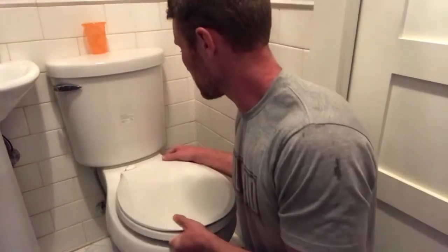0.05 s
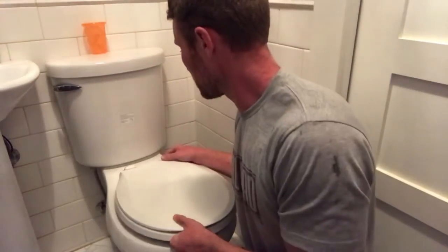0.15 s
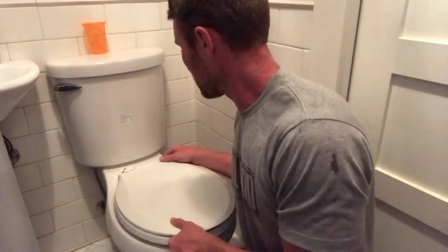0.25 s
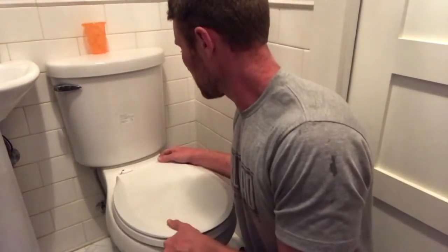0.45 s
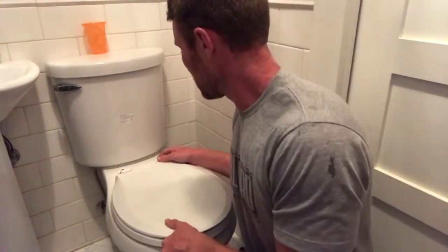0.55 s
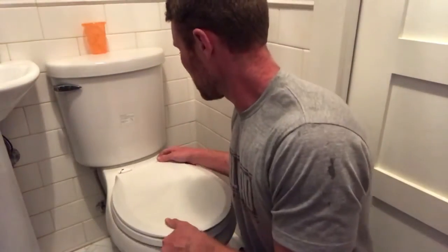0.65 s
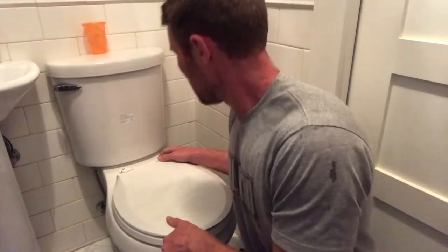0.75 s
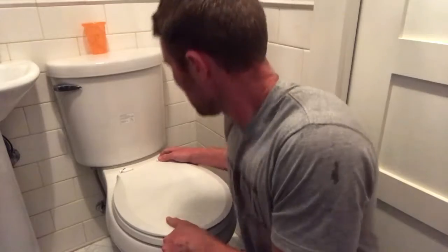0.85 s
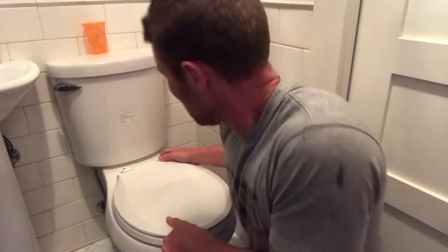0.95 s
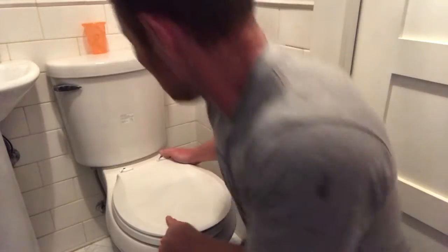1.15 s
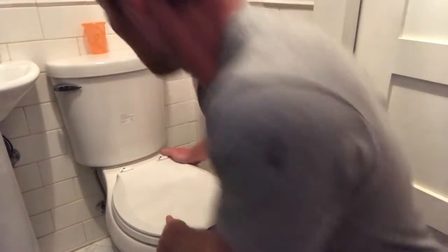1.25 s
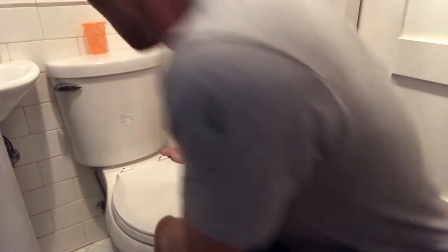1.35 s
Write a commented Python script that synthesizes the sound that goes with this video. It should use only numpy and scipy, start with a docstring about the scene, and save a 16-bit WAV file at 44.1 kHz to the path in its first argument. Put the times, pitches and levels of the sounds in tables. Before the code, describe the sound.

A toilet seat lands close by with a quick double knock, the second louder, leaving a short ring and deep boom in a small tiled bathroom. It settles with a soft bump, and a hand rubs faintly over low ventilation.

```python
"""A soft knock, then a sharper clack: a toilet seat is set down on its bowl in a small tiled bathroom.
The blows set seat and porcelain ringing, the tiles throw the clack back and a deep room boom hangs on.
The seat settles on its bumpers; light bumps and the rub of a hand come before and after.
Underneath are quiet ventilation, a low rumble and a faint regular tick."""
import sys
import numpy as np
from scipy import signal
from scipy.fft import irfft
from scipy.io import wavfile
from scipy.ndimage import uniform_filter1d

SR = 44100
rng = np.random.default_rng(int(sys.argv[2]) if len(sys.argv) > 2 else 0)


def int16_out(signal):
    """Quantize to a 16-bit WAV file."""
    q = np.round(np.clip(np.atleast_2d(signal).T, -1, 1) * 32767)
    wavfile.write(sys.argv[1], SR, q.astype(np.int16))


N = 61739

# tone colour of the seat's clack and of the hand's hiss on it (frequency [Hz], level [dB])
CLACK_SPECTRUM = [(20, -35.5), (200, 3), (1000, -0.5), (1300, -7.5), (1550, -4.5), (1900, 3), (2450, 1),
                  (3100, 0), (3700, -15), (4400, -21.5), (5000, -52), (5800, -32), (7500, -80.5),
                  (15000, -83.5)]


def amp(db):
    """Decibels to gain."""
    return 10 ** (np.asarray(db) / 20)


def unit(x):
    """Scales to rms 1."""
    return x / np.sqrt(np.mean(x ** 2) + 1e-20)


def read(points, hz):
    """Reads a table on a log-frequency axis."""
    f, value = np.transpose(points)
    return np.interp(np.log(hz + 1), np.log(f + 1), value)


def add(mix, start_s, sound):
    """Lays a sound into the mix."""
    part = mix[round(start_s * SR):][:len(sound)]
    part += sound[:len(part)]


def noise(gain):
    """Noise of rms 1 shaped by the function gain(Hz)."""
    hz = np.fft.rfftfreq(N, 1 / SR)
    return unit(irfft(gain(hz) * np.exp(2j * np.pi * rng.random(len(hz))), N))


def coloured(spectrum):
    """Noise with the tone colour of a table."""
    return noise(lambda f: amp(read(spectrum, f)))


def narrow(hz, width_hz):
    """Noise in one resonance."""
    return noise(lambda f: 1 / (1 + ((f - hz) / width_hz * 1.14) ** 2))


def steady(x, size=900):
    """Evens out a noise's chance swells over about size samples."""
    power = uniform_filter1d(uniform_filter1d(x ** 2, size), size // 2)
    return x / np.sqrt(abs(power) + 1e-9)


def ventilation():
    """Soft moving air with a faint flicker, and two steady hums."""
    # colour of the air (frequency [Hz], level [dB])
    air_spectrum = [(15, -28.5), (45, -1), (80, -6.5), (120, -3.5), (160, -7.5), (280, -9.5), (450, -15),
                    (650, -12), (1000, -17.5), (1600, -21), (3200, -25.5), (4200, -28.5), (4900, -33),
                    (5500, -31), (6800, -31.5), (8000, -35.5), (10500, -39.5), (15000, -38)]
    # hums of the ventilation (frequency [Hz], width [Hz], level [dB])
    hums = [(118.3, 5, -68.5), (663, 58, -73)]
    bands = signal.stft(coloured(air_spectrum), nperseg=512)[2]
    patches = uniform_filter1d(rng.standard_normal(bands.shape), size=8, axis=0)
    flicker_db = unit(uniform_filter1d(patches, size=8, axis=1))
    air = amp(-64) * signal.istft(bands * amp(flicker_db), nperseg=512)[1][:N]
    return air + sum(amp(db) * steady(narrow(hz, width), size=6000) for hz, width, db in hums)


def ticks(first_s=0.051, period_s=0.1023, length_s=0.007):
    """Tiny bright blips of noise, about ten a second."""
    out = np.zeros(N)
    window = np.hanning(round(length_s * SR))
    for k in range(14):
        blip = window * narrow(hz=3070, width_hz=500)[:len(window)]
        add(out, first_s + k * period_s, amp(-67.5) * blip)
    return out


def rumble():
    """Faint noise around the room's lowest mode while the seat is handled."""
    # fader curve of the rumble (time [s], level [dB])
    fader = [(0, -55.5), (0.12, -64), (0.2, -60.5), (0.5, -91), (0.64, -61.5), (0.9, -65), (1.0, -79),
             (1.25, -84), (1.4, -65)]
    level_db = np.interp(np.arange(N) / SR, *np.transpose(fader))
    return amp(level_db) * steady(narrow(hz=49.6, width_hz=36), size=4000)


def room_boom(hz=50.7, swell_s=0.083, t60=0.46):
    """The lowest mode of the room swells and dies."""
    t = np.arange(N) / SR
    swell = np.sin(np.pi / 2 * np.minimum(t / swell_s, 1))
    return swell * amp(-26 - 60 * t / t60) * np.sin(2 * np.pi * hz * t)


def tile_tail(spectrum):
    """Dense reflections off the tiles, each band dying at the room's rate."""
    # reverb time of the bathroom (frequency [Hz], t60 [s])
    room_t60 = [(80, 0.38), (260, 0.4), (700, 0.34), (1200, 0.31), (2000, 0.2), (3200, 0.21), (6000, 0.13)]
    hz, t, bands = signal.stft(steady(coloured(spectrum)), SR, nperseg=512, noverlap=384)
    decay = amp(-60 * t / read(room_t60, hz)[:, None])
    return signal.istft(bands * decay, SR, nperseg=512, noverlap=384)[1][:N]


def hand_rub(length_s, hiss_db, ring_db):
    """A sliding hand: soft friction that makes the porcelain bowl sing faintly."""
    sound = amp(hiss_db) * coloured(CLACK_SPECTRUM) + amp(ring_db) * narrow(hz=656.5, width_hz=55)
    window = signal.windows.tukey(round(length_s * SR), 0.5)
    return window * sound[:len(window)]


def settle(db, tilt_db, rise_s=0.0013, t60=0.12):
    """The seat sinks onto its bumpers: a short dull push without any clack."""
    # colour of the push before its tilt (frequency [Hz], level [dB])
    push_spectrum = [(20, -53), (50, -17), (80, -8), (160, 3), (200, -7), (285, 5.5), (410, -15.5),
                     (750, -6), (1050, -12), (1400, -34.5), (4000, -61.5), (15000, -88)]
    t = np.arange(N) / SR
    push = noise(lambda f: amp(read(push_spectrum, f) + tilt_db * np.log2(f + 20)))
    return steady(push, size=600) * (1 - np.exp(-t / rise_s)) * amp(db - 60 * t / t60)


def ring(modes, free_s, mute_s=0.014):
    """Modes build up and decay; after free_s a new blow or the hand chokes them."""
    t = np.arange(N) / SR
    sound = np.zeros(N)
    for hz, db, t60, rise_s in modes:
        envelope = amp(db - 60 * t / t60) * (1 - np.exp(-t / rise_s))
        sound += envelope * np.sin(2 * np.pi * (hz * t + rng.random()))
    return sound * np.exp(-np.maximum(t - free_s, 0) / mute_s)


def clack(contact_s, crack_t60=0.0073, clatter_t60=0.092):
    """Crack of contact, the seat's clatter and the tiles' answer; a briefer contact is crisper."""
    t = np.arange(N) / SR
    envelope = amp(5.5 - 60 * t / crack_t60) + amp(-4 - 60 * t / clatter_t60)
    direct = steady(coloured(CLACK_SPECTRUM), size=120) * envelope
    reflected = amp(-7.5) * tile_tail(CLACK_SPECTRUM)
    return (direct + reflected) * (1 - np.exp(-t / contact_s))


def knock(free_s, contact_s, thud_db, clack_db, seat_db, bowl_db):
    """One blow of seat on bowl: a thud for weight, a clack for edge, and the ring of both bodies."""
    # colour of the thud (frequency [Hz], level [dB])
    thud_spectrum = [(20, -45.5), (50, -16.5), (75, -1.5), (160, -1.5), (300, -0.5), (420, -13), (620, 1),
                     (820, -5.5), (1080, -1), (1300, -18.5), (2000, -12.5), (5000, -68.5), (15000, -100)]
    # resonances of the seat (frequency [Hz], level [dB], t60 [s], build-up [s])
    seat_modes = [(718.5, -8.5, .19, 0.0045), (749, -9.5, .13, 0.0017), (968.7, 9.5, .31, 0.047),
                  (987, 0.5, 0.37, 0.015), (1100, -4.5, 0.22, 0.026), (1120, -19.5, 0.06, 0.022),
                  (1355, -11.5, 0.28, 0.015)]
    # resonances of the porcelain bowl (frequency [Hz], level [dB], t60 [s], build-up [s])
    bowl_modes = [(74.6, -12.5, 0.28, 0.0064), (125, -11.5, 0.23, 0.009), (159.6, -8.5, 0.28, 0.0071),
                  (236, 0.5, 0.15, 0.0034), (291, -6, 0.47, 0.0068), (313, -7, 0.32, 0.002),
                  (621, 4.5, 0.41, 0.027), (658.3, 2, 0.26, 0.004)]
    thud_rise_s, throb_hz = 0.0046, 7.07
    grip_s = 0.165  # from here on the hand damps the seat
    t = np.arange(N) / SR
    thud = tile_tail(thud_spectrum) * (1 - np.exp(-t / thud_rise_s))
    impact = amp(thud_db) * thud + amp(clack_db) * clack(contact_s)
    throb = 1 + 0.68 * np.sin(2 * np.pi * throb_hz * t)
    seat = amp(seat_db) * ring(seat_modes, min(free_s, grip_s)) * throb
    bowl = amp(bowl_db) * ring(bowl_modes, free_s)
    bumper_lowpass = signal.butter(4, 5700, fs=SR, output="sos")  # the bumpers pass little treble
    return signal.sosfilt(bumper_lowpass, impact + seat + bowl)


def scene():
    """The room tone with the seat's knocks, pushes and rubs on top, in mono."""
    # blows on the seat (time [s], contact [s], thud [dB], clack [dB], seat ring [dB], bowl ring [dB])
    blows = [(0.002, 0.00033, -58.5, -53, -65.5, -57), (0.2281, 0.0033, -36, -42, -40, -52.5),
             (0.2768, 0.0019, -45, -31.5, -50.5, -40.5), (0.2802, 0.00054, -33, -28.5, -33.5, -32),
             (0.775, .001, -62, -55.5, -88, -69)]
    # pushes on the bumpers (time [s], level [dB], tilt [dB/octave])
    pushes = [(0.234, -40, -1.5), (0.286, -31, -2.5), (0.308, -33, 1), (0.779, -50.5, -0.5),
              (0.795, -47, -1.5), (0.836, -59, -6)]
    # slides of the hand on the seat (time [s], length [s], hiss [dB], ring [dB])
    slides = [(0.005, 0.058, -94, -53), (0.949, 0.095, -71.5, -69), (0.998, 0.21, -78, -69.5)]
    out = ventilation() + ticks() + rumble()
    gaps_s = np.diff([blow[0] for blow in blows] + [N / SR])
    for (start_s, *blow), gap_s in zip(blows, gaps_s):
        add(out, start_s, knock(gap_s, *blow))
    for start_s, *push in pushes:
        add(out, start_s, settle(*push))
    for start_s, *slide in slides:
        add(out, start_s, hand_rub(*slide))
    add(out, 0.316, room_boom())  # just after the hardest knock
    return out[None]


def record(dry, cutoff_hz=15300):
    """A steep low-pass trims the very top."""
    taps = signal.firwin(511, cutoff_hz, window=("kaiser", 9), fs=SR)
    return signal.oaconvolve(dry, taps[None], "same")


dry = scene()
out = record(dry)
int16_out(out)
```